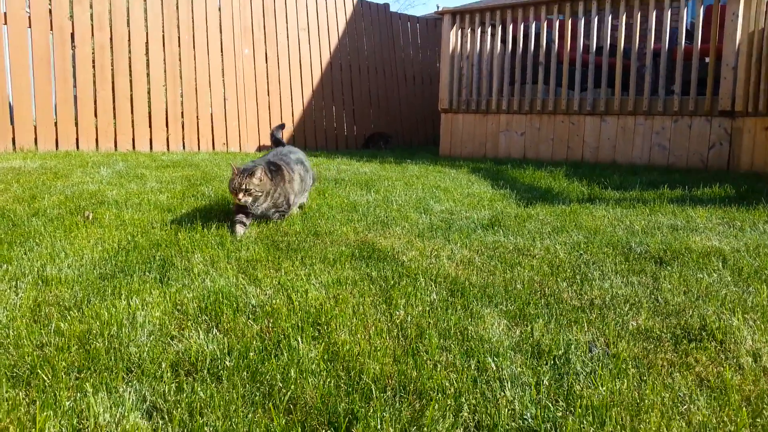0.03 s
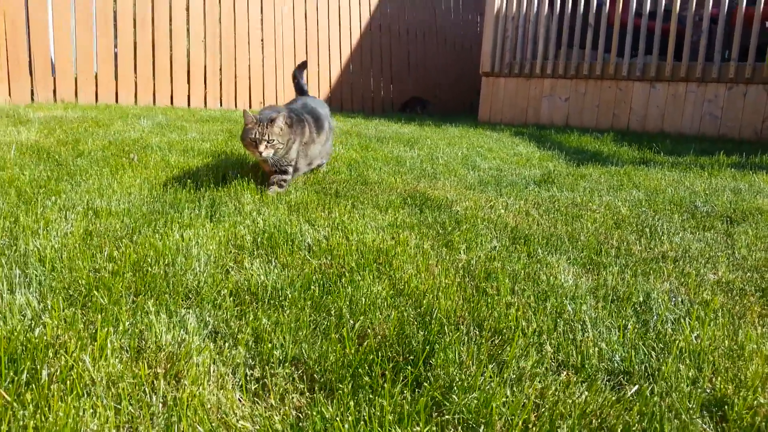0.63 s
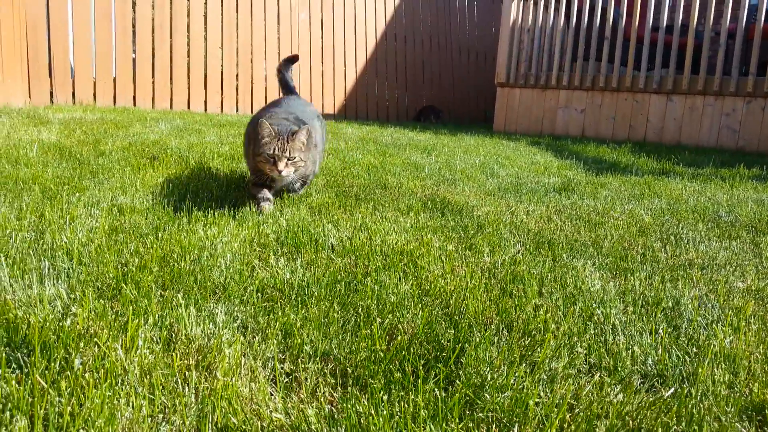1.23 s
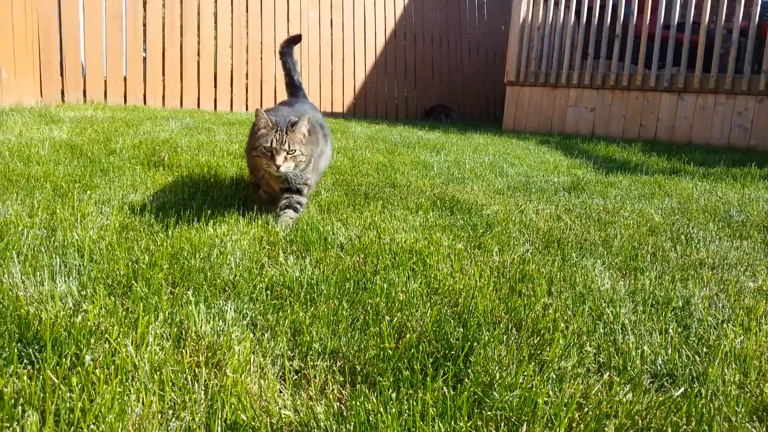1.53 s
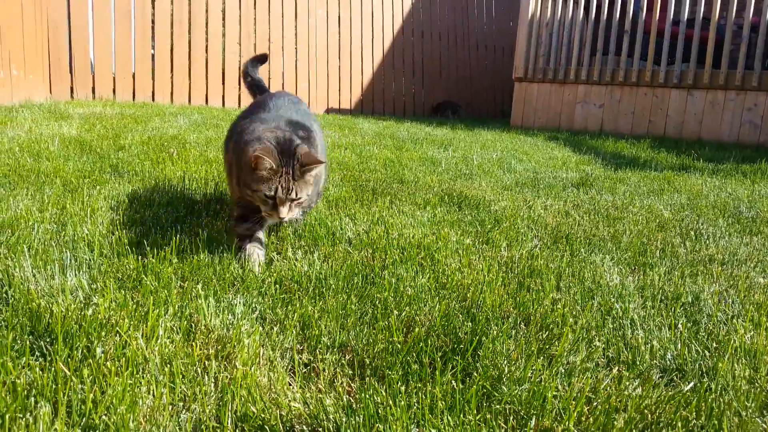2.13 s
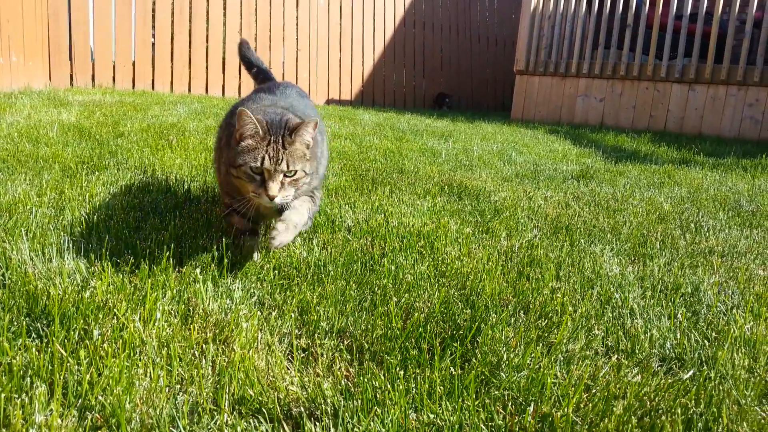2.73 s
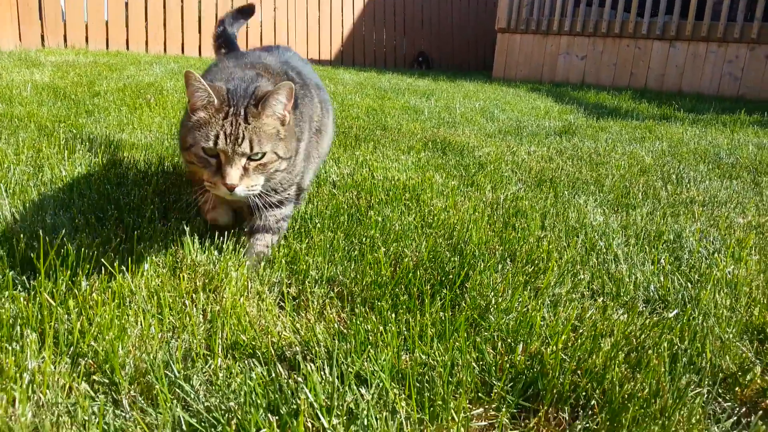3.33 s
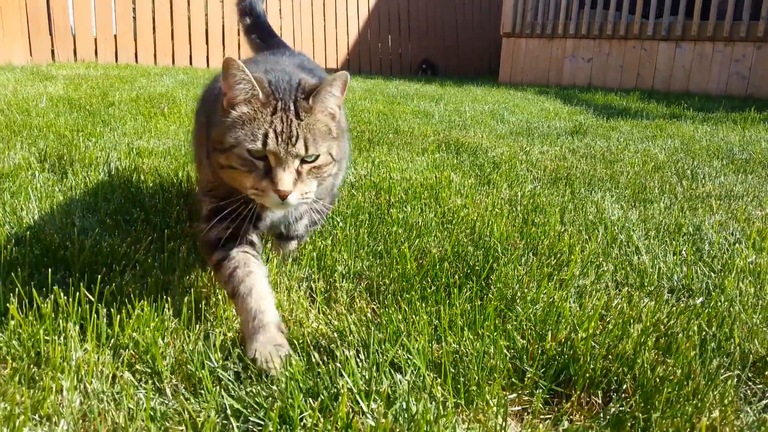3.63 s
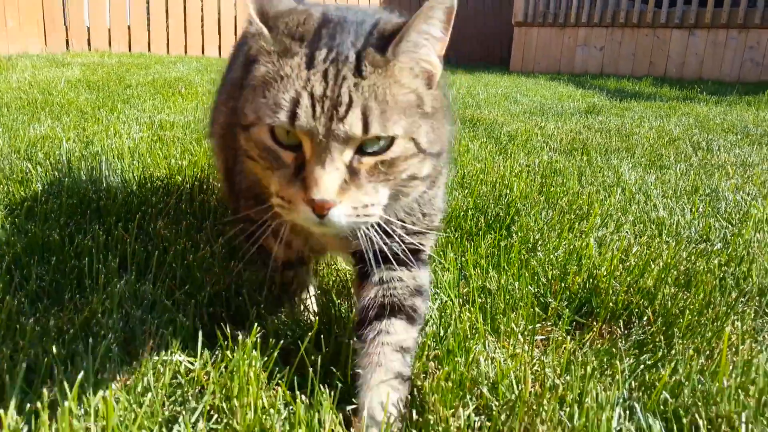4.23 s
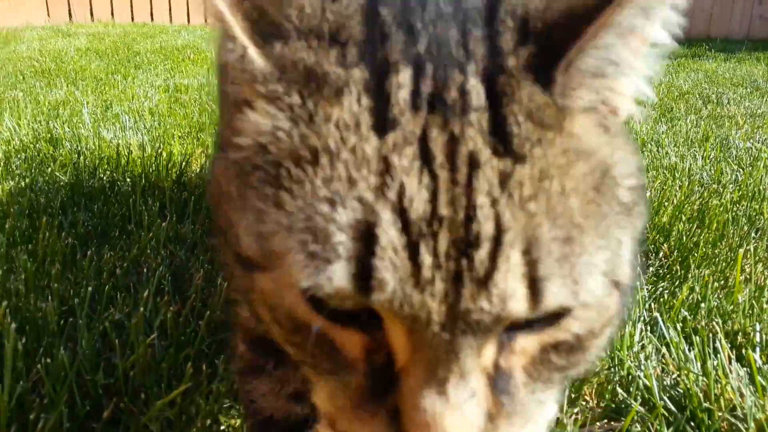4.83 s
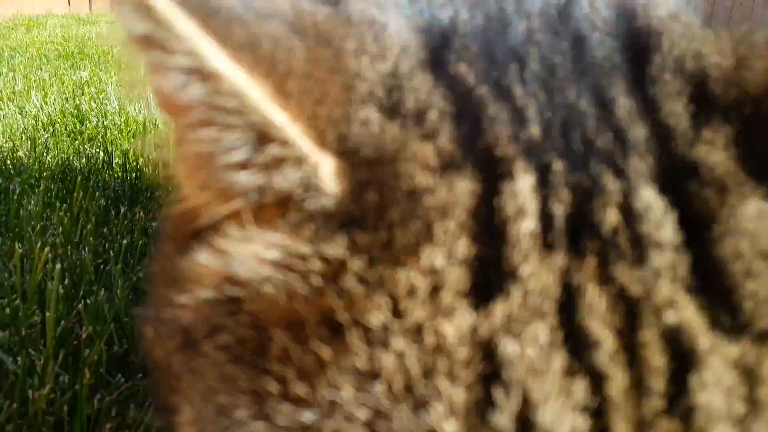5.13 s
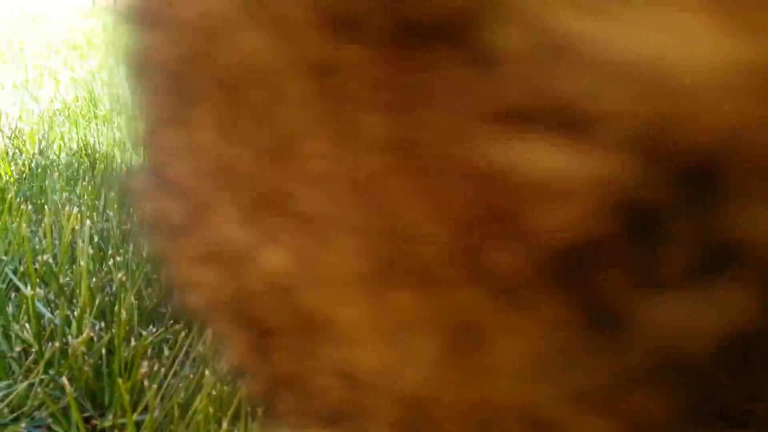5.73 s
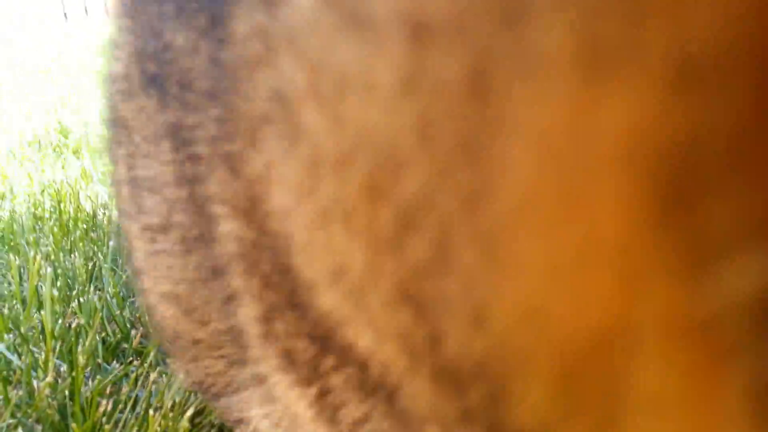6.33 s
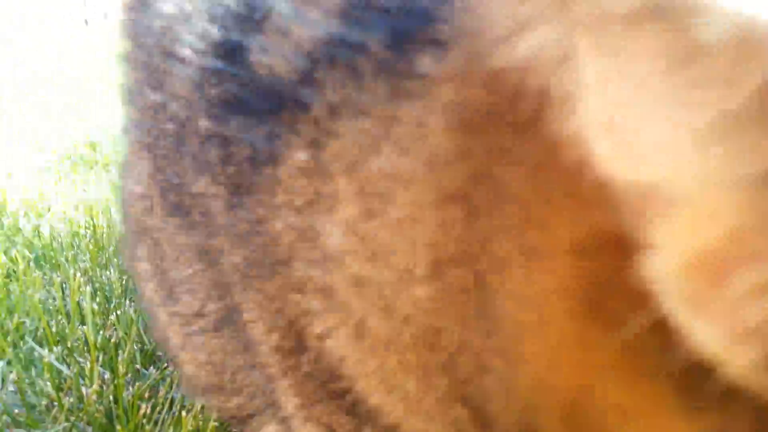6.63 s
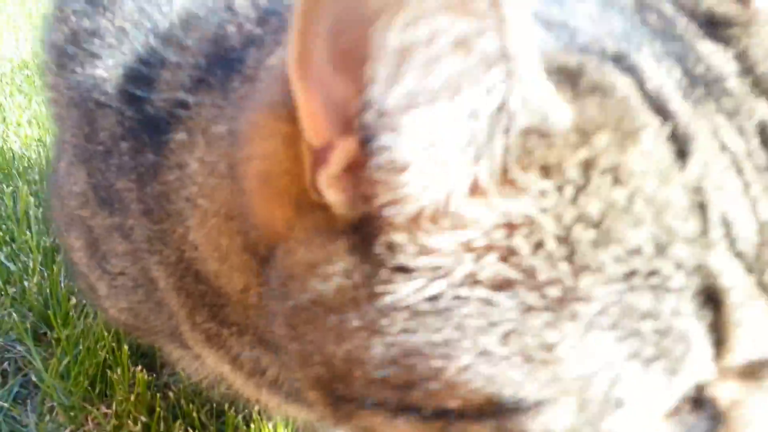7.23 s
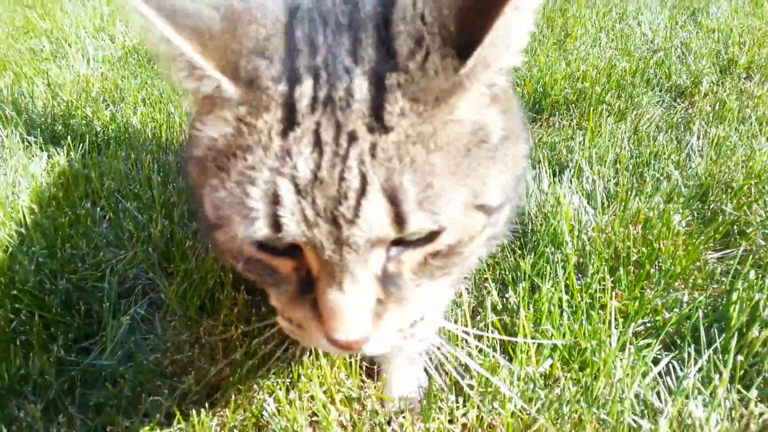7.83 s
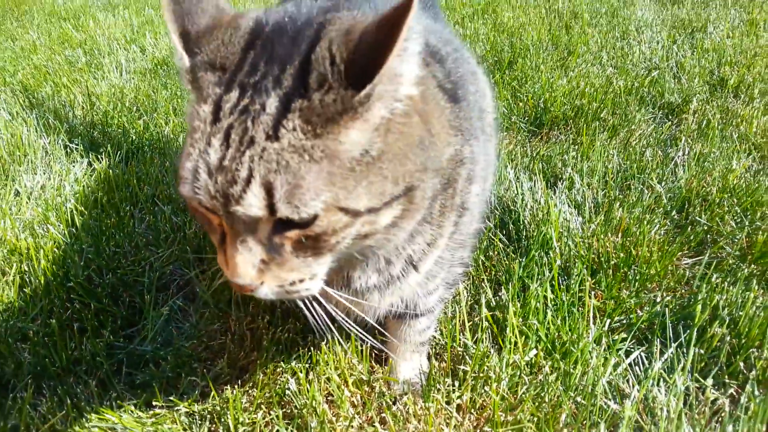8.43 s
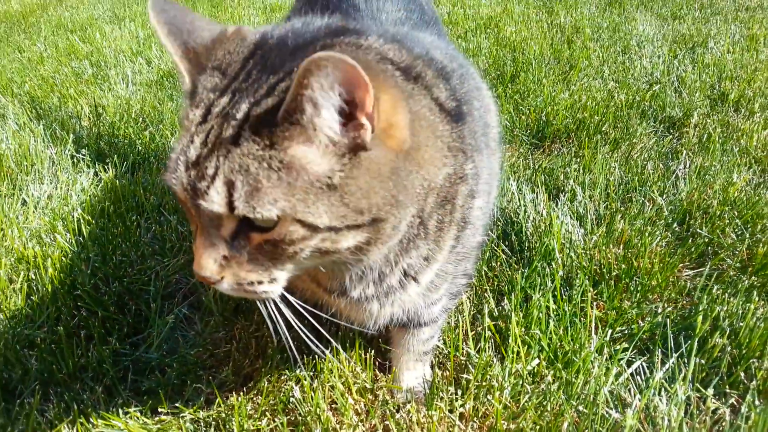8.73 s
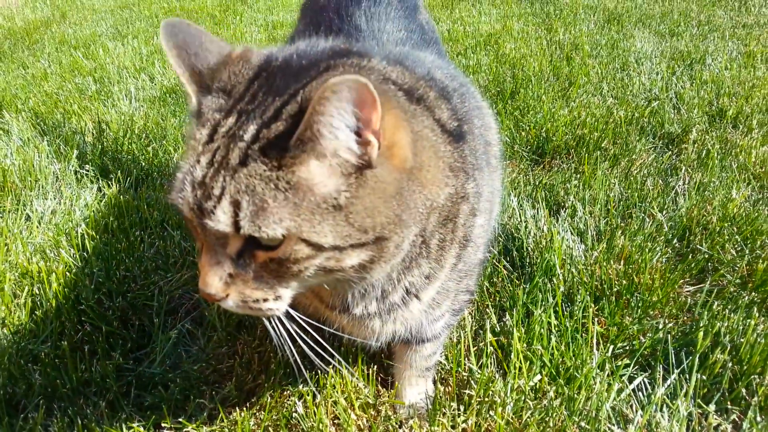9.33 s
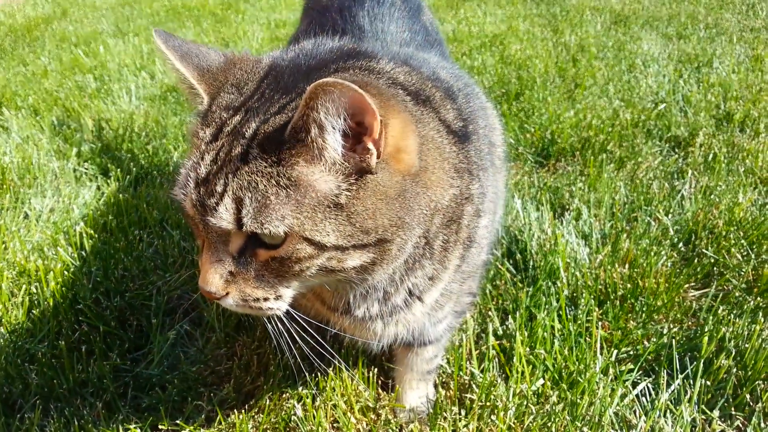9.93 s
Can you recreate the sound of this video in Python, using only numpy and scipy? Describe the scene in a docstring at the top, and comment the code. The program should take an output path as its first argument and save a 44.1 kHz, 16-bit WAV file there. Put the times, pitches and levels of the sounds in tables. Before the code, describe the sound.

Faint swishes of a cat's paws in lawn grass come closer to a handheld microphone, over soft outdoor rumble and a distant engine. A sharp click follows, then about three seconds of very close fur brushing, with low rumbling and thumps shifting between left and right. The rubbing peaks and eases off, and a small bird chirps faintly at the end among soft hand bumps.

```python
"""A cat rubs its head on the camera

A cat swishes through lawn grass up to a camera held low, then rubs its head on the case.
Fur hisses past the two microphone ports (small holes) and pumps the air in each as it presses on it;
tufts snag and thump, whiskers scratch, the case ticks and shifts in the hand.
A far engine drones behind the garden, and a small bird chirps at the end."""
import sys
import numpy as np
from scipy import signal
from scipy.fft import rfft, irfft, next_fast_len
from scipy.io import wavfile

SR = 44100
rng = np.random.default_rng(int(sys.argv[2]) if len(sys.argv) > 2 else 0)


def materialize(psi):
    """Save the field psi as 16-bit PCM at rate SR to the path in sys.argv[1].

    A 1-D psi becomes a single channel; in a 2-D psi each row is a channel.
    """
    bounded = np.clip(np.atleast_2d(psi).T, -1, 1)
    quanta = np.round(bounded * 32767).astype(np.int16)
    wavfile.write(sys.argv[1], SR, quanta)


N = 439677
TIME = np.arange(N) / SR
SLOW_TIME = TIME[::64]  # coarse clock for loudness curves

# tone of hair scraping the case: f/Hz, level/dB
SCRAPE_COLOUR = [(2500, -5), (4300, 3), (5700, 5.5), (7000, 1.5), (9000, -21)]


def amp(db):
    """Turns decibels into a gain."""
    return 10 ** (np.asarray(db) / 20)


def unit(x):
    """Scales a signal to an average power of 1."""
    return x / np.sqrt(np.mean(x ** 2) + 1e-20)


def at_hz(rows, hz, column=1):
    """Reads a table between its rows, on a log-frequency scale."""
    table = np.transpose(rows)
    return np.interp(np.log(hz + 1), np.log(table[0] + 1), table[column])


def curve(rows):
    """Joins (time, value) points with straight lines."""
    return np.interp(TIME, *np.transpose(rows))


def sides(pan_db):
    """Left and right gains; pan is how much louder the left is."""
    return unit(amp([[pan_db / 2], [-pan_db / 2]]))


def add(mix, start, sound):
    """Mixes a sound in at a start time in seconds."""
    part = mix[..., max(round(start * SR), 0):][..., :sound.shape[-1]]
    part += sound[..., :part.shape[-1]]


def shaped(x, colour):
    """Filters a signal by a colour (a level for each frequency), then scales it to power 1."""
    size = next_fast_len(N)
    gain = amp(at_hz(colour, np.fft.rfftfreq(size, 1 / SR)))
    return unit(irfft(rfft(x, size) * gain, size)[..., :N])


def wander(per_s):
    """A random curve of power 1 that heads for a new value per_s times a second."""
    return unit(np.interp(TIME * per_s, np.arange(4096), rng.standard_normal(4096)))


def grains(per_s, spread_db=0):
    """Tiny random clicks at both ports; more spread makes their sizes more unequal."""
    size = amp(spread_db * np.minimum(rng.exponential(1, (2, N)), 4.5))
    return unit(size * rng.choice([-1, 1], (2, N)) * (rng.random((2, N)) < per_s / SR))


def distant_noise():
    """Noise whose bass is much the same at both ports."""
    # how alike left and right are: f/Hz, likeness (0 to 1)
    likeness = [(60, 0.73), (200, 0.89), (350, 0.66), (700, 0.29), (1400, 0)]
    size = next_fast_len(N)
    left, other = rfft(rng.standard_normal((2, size)))
    same = at_hz(likeness, np.fft.rfftfreq(size, 1 / SR))
    right = same * left + np.sqrt(1 - same ** 2) * other
    return irfft([left, right], size)[:, :N]


def from_right(pair, same):
    """Part of the sound reaches the left port 9 samples after the right."""
    left, right = pair
    return np.array([same * np.roll(right, 9) + np.sqrt(1 - same ** 2) * left, right])


def gains(powers):
    """Turns power curves on the coarse clock into gains at every sample."""
    return np.array([np.interp(TIME, SLOW_TIME, np.sqrt(p)) for p in powers])


def swells(rows):
    """Left and right gains for sounds that each swell to a peak and fade."""
    shape = 1.35  # 2 is round, 1 pointed
    return gains(sum((amp(db) * sides(pan)) ** 2 * np.exp(-abs((SLOW_TIME - peak) / half) ** shape)
                     for peak, db, half, pan in rows))


def held(start, length, attack_s, release_s, sag_db_per_s=0):
    """Gain of one touch on the coarse clock: it builds up, holds or sags, and dies away."""
    t = SLOW_TIME - start
    rise = np.clip(t / attack_s, 0, 1)
    sag = amp(-sag_db_per_s * np.clip(t, 0, length))
    return rise * sag * np.exp(-np.maximum(t - length, 0) / release_s)


def garden():
    """The neighbourhood rumbles low while a far engine wavers and fades in and out of it."""
    # the engine's lowest note: t/s, level/dB
    drone_levels = [(0, -55), (.9, -61), (2.1, -76.5), (2.95, -61), (3.5, -70.5), (8.2, -61.5), (9.7, -56)]
    # its overtones together: t/s, level/dB
    overtone_levels = [(2.6, -77.5), (3.2, -69.5), (8.6, -64)]
    # each overtone's share: multiple of the lowest note, level/dB
    overtones = [(2, 0), (3, -16), (4, -12), (6, -16)]
    # loudness of the garden air: t/s, level/dB
    air_levels = [(0, -61), (.15, -56.5), (1, -62), (1.8, -59), (2.5, -63.5), (3.4, -62.5), (3.9, -59),
                  (8.2, -59)]
    # its tone: f/Hz, level/dB
    air_colour = [(20, -30), (50, -6.5), (85, 0.5), (190, -1.5), (330, -8.5), (600, -14.5), (900, -11),
                  (1500, -19), (3000, -26), (7000, -36), (14500, -27)]
    engine_hz = 98.9 * (1 + 0.016 * wander(12))
    turns = np.cumsum(engine_hz) / SR
    drone = amp(curve(drone_levels)) * unit(amp(3.3 * wander(20)) * np.sin(2 * np.pi * turns))
    buzz = sum(amp(db + 2 * wander(12)) * np.sin(2 * np.pi * (multiple * turns + rng.random()))
               for multiple, db in overtones)
    air = amp(curve(air_levels) + 1.6 * wander(14)) * shaped(distant_noise(), air_colour)
    return air + drone + amp(curve(overtone_levels)) * unit(buzz)


def ticks():
    """A hard tip flicks the case: a brief burst, a rebound and a faint rattle, all ringing in it."""
    # sharp ticks: t/s, level/dB, f/Hz, pan/dB, cycles to the peak, rattle/dB
    hits = [(0.092, -27.5, 1850, 7, 0.27, -36), (4.288, -46.5, 5550, 17, 0.48, -42),
            (4.4057, -13.5, 10960, -12, 0.57, -41.5), (6.5076, -32.5, 5560, 22, 0.15, -44),
            (6.9948, -37.5, 6800, 10, 0.3, -42)]
    # the notes the case rings at: f/Hz, left/dB, right/dB
    case_notes = [(3760, -2, 6.5), (4820, 6, -16), (6100, 4.5, 4), (10100, -23, 1), (14230, 11, -15.5)]
    decay_s, rebound_s = 0.00035, 0.001123
    taps, t = np.zeros((2, N)), np.arange(4096) / SR
    case = sum(amp([[left], [right]]) * np.cos(2 * np.pi * hz * t) for hz, left, right in case_notes)
    case *= 2 / (decay_s * SR) * np.exp(-t / decay_s)
    for start, db, hz, pan, cycles, rattle_db in hits:
        age = hz * t / cycles  # 1 at the peak
        burst = age * np.exp(1 - age) * np.cos(2 * np.pi * hz * t)
        rattle_fade = .04 * np.exp(-t / .001) + amp(rattle_db) * np.exp(-t / .014)
        rattle = rattle_fade * rng.standard_normal((2, len(t)))
        add(taps, start, amp(db + 4.5) * sides(pan) * (burst + rattle))
        add(taps, start + rebound_s, amp(db - 13.5) * sides(pan) * burst)
    return amp(-6.5) * taps + signal.oaconvolve(taps, case, axes=1)[:, :N]


def handling():
    """The camera shifts in the hand and catches puffs of air; nudging fingers make it ring briefly."""
    # soft bumps and puffs: t/s, level/dB, half length/s, pan/dB
    bumps = [(.1, -46.5, 0.015, 1), (.825, -50.5, 0.011, -1), (1.19, -49, 0.017, 0), (1.556, -44, 0.02, 1),
             (1.61, -44, 0.018, -4), (1.7, -47, 0.037, -4.5), (3.6, -46.5, 0.0041, -4),
             (4.03, -43.5, 0.018, -3), (8.37, -54, 0.012, 2), (8.69, -47, 0.017, 3),
             (8.975, -46.5, 0.0085, -1), (9.15, -50.5, 0.031, 2), (9.235, -48, 0.013, 3),
             (9.4, -46.5, 0.013, 1), (9.465, -48.5, 0.017, 1)]
    # their tone: f/Hz, level/dB
    bump_colour = [(20, -9), (50, -15), (90, 8.5), (135, -2.5), (185, -1), (280, -10.5), (1500, -24),
                   (5000, -45)]
    # finger nudges: t/s, level/dB, f/Hz, decay/s
    knocks = [(4.021, -34, 191, 0.022), (8.671, -36.5, 82, 0.0073), (9.392, -38, 76, 0.017),
              (9.904, -40, 68.5, 0.036)]
    out = swells(bumps) * shaped(distant_noise(), bump_colour)
    for start, db, hz, decay_s in knocks:
        t = np.maximum(TIME - start, 0)
        out += amp(db) * np.sin(2 * np.pi * hz * t) * np.exp(-t / decay_s)
    add_thump(out[1], 1.581, push=-.09, hz=130)  # one puff goes straight into the right port
    return out


def add_thump(channel, peak_s, push, hz):
    """A port is plugged or pulled free: one pressure spike, then a rebound as its air leaks back."""
    leak_hz = 64  # below this a port cannot hold pressure
    t = np.arange(-900, 1500) / SR
    angle = np.pi * hz * t
    spike = (1 - 2 * angle ** 2) / (1 + angle ** 2 / 2) ** 4
    spike = signal.lfilter(*signal.butter(2, leak_hz, "highpass", fs=SR), spike)
    add(channel, peak_s - spike.argmax() / SR, push * spike / spike.max())


def whoosh():
    """A faint, far, mid-pitched rush swells and fades."""
    # its swells: t/s, level/dB, half length/s, pan/dB
    rushes = [(.275, -61, 0.032, 0), (.46, -65.5, 0.2, 2)]
    # its tone: f/Hz, level/dB
    rush_colour = [(400, -16), (800, -7), (1100, -1), (1600, -17), (4000, -54)]
    return swells(rushes) * shaped(distant_noise(), rush_colour)


def grass():
    """Blades scrape along the legs at each step; now and then one whips past with a brighter flick."""
    # paws and legs in the grass: t/s, level/dB, half length/s, pan/dB
    steps = [(.48, -60, 0.016, 6), (.597, -57, 0.012, 2), (1.19, -59, 0.038, -1.5),
             (1.92, -58.5, 0.017, -2), (2.103, -57, 0.0088, 0), (2.155, -51.5, 0.021, -0.5),
             (2.358, -57, 0.0084, -2), (2.642, -62.5, 0.011, 2), (3.13, -52.5, 0.043, 0),
             (3.225, -51, 0.038, 1.5), (3.82, -44.5, 0.02, -1.5), (3.89, -52, 0.026, -0.5),
             (3.945, -52, 0.013, 2), (4.1, -61, 0.14, 2), (4.295, -46.5, 0.017, 3), (4.345, -47, 0.021, 0),
             (4.62, -49, 0.047, -2), (4.94, -44, 0.034, -0.5), (5.07, -50.5, 0.046, 3),
             (5.38, -56, 0.028, 10), (5.82, -53, 0.026, 5), (7.95, -50, 0.017, -2),
             (8.85, -56.5, 0.014, -4)]
    # single whipping blades: t/s, level/dB, half length/s, pan/dB
    flicks = [(2.787, -47.5, 0.012, 8), (5.655, -54, 0.011, 0)]
    # tone of a step: f/Hz, level/dB
    step_colour = [(100, -23.5), (400, 8), (1500, 6), (3000, 2), (5000, 4.5), (14500, 5)]
    # tone of a flick: f/Hz, level/dB
    flick_colour = [(1500, -7.5), (7000, -4), (10500, 5.5), (14500, 6.5)]
    blades = grains(per_s=1700, spread_db=2.5) + 0.5 * rng.standard_normal((2, N))
    flutter = amp(-4.5 + 1.2 * wander(70))
    swish = flutter * swells(steps) * shaped(from_right(blades, same=0.05), step_colour)
    return swish + swells(flicks) * shaped(blades, flick_colour)


def thin_hiss():
    """A faint, thin hiss, mostly on the left, while the cat closes in."""
    # its tone: f/Hz, level/dB
    hiss_colour = [(3800, -13), (5700, 0), (8000, -7)]
    fade = gains([held(start=3.04, length=2.16, attack_s=0.4, release_s=0.28) ** 2])
    level = amp(-74 + 2 * wander(11)) * fade
    return level * sides(6) * shaped(rng.standard_normal((2, N)), hiss_colour)


def buffeting():
    """Fur dragging across a port pumps its air in lumps, harder while the head leans on that port."""
    # the head leans: t/s, length/s, level/dB, port (0 left, 1 right)
    leans = [(4.718, 0.42, -40.5, 0), (4.872, 0.14, -35.5, 0), (5.694, 0.36, -41.5, 0),
             (6.059, 0.38, -36.5, 0), (6.823, 0.12, -35.5, 0), (6.977, 0.19, -36, 0),
             (4.694, 0.45, -38.5, 1), (5.294, 0.18, -36.5, 1), (5.888, 0.76, -39, 1),
             (6.604, 0.2, -30.5, 1), (6.928, 0.099, -27.5, 1), (7.076, 0.15, -32, 1),
             (7.273, 0.21, -31.5, 1), (7.551, 0.14, -35.5, 1), (7.765, 0.16, -34.5, 1)]
    # tone of the lumps of air: f/Hz, level/dB
    lump_colour = [(15, -58), (30, -18), (55, 1), (110, 2.5), (190, -4), (300, -18.5), (480, -33),
                   (1500, -39.5), (4000, -59)]
    # the higher scuff of the hardest leans: f/Hz, level/dB
    scuff_colour = [(120, -9), (260, 6), (420, -5.5), (750, -15.5), (1550, -43)]
    attack_s, release_s = 0.016, 0.021
    light_touch = amp(-50.5) * held(4.66, 3.38, attack_s, release_s)  # fur resting on both ports
    power = np.ones((2, 1)) * light_touch ** 2
    for start, length, db, port in leans:
        power[port] += (amp(db) * held(start, length, attack_s, release_s)) ** 2
    pressure = gains(power)
    flutter_db = 2 * np.array([wander(45), wander(45)])  # the fur drags unevenly
    slip_db = 4.5 * np.maximum([wander(32), wander(32)], 0)  # and at moments loses its grip
    lumps = grains(per_s=120, spread_db=0.6) + .25 * rng.standard_normal((2, N))
    scuff = amp(-11) * pressure / pressure.max() * shaped(grains(per_s=900), scuff_colour)
    return pressure * amp(3.5 + flutter_db - slip_db) * (shaped(lumps, lump_colour) + scuff)


def snags():
    """Tufts of fur catch in a port and let go with a thump."""
    # tufts: t/s, peak pressure (suction is negative), f/Hz, port (0 left, 1 right)
    tufts = [(4.698, -0.029, 98, 0), (4.7633, -0.11, 130, 1), (4.8733, -0.13, 160, 1),
             (4.9224, 0.07, 100, 0), (4.9497, -0.11, 135, 0), (4.9679, -0.13, 95, 0),
             (5.003, -0.21, 151, 0), (5.092, -0.048, 130, 1), (5.3148, 0.065, 120, 1),
             (5.3685, -0.059, 122, 1), (5.4162, -0.072, 130, 1), (5.443, -0.071, 111, 1),
             (5.467, -0.037, 167, 1), (5.8, -0.08, 124, 1), (5.907, -0.026, 110, 0),
             (5.959, -0.023, 120, 1), (6.004, -0.036, 114, 0), (6.0929, 0.093, 123, 0),
             (6.1882, 0.091, 130, 0), (6.211, -0.095, 118, 1), (6.2554, -0.12, 128, 1),
             (6.2888, 0.077, 134, 0), (6.457, -0.064, 107, 0), (6.5418, -0.096, 137, 1),
             (6.622, 0.066, 190, 1), (6.6301, 0.12, 158, 1), (6.646, -0.19, 163, 1), (6.6563, 0.17, 203, 1),
             (6.7019, 0.19, 193, 1), (6.7384, 0.11, 188, 1), (6.752, -0.14, 139, 1), (6.769, -.32, 166, 1),
             (6.7834, 0.23, 188, 1), (6.9646, 0.12, 240, 1), (6.995, 0.25, 218, 1), (7.029, 0.33, 220, 1),
             (7.1556, -0.1, 150, 1), (7.1637, 0.15, 250, 1), (7.2005, 0.13, 240, 1), (7.2081, 0.13, 115, 1),
             (7.3491, 0.12, 137, 1), (7.3747, -0.13, 121, 1), (7.4506, 0.11, 170, 1),
             (7.8143, -0.059, 138, 1), (7.858, -0.031, 145, 1)]
    out = np.zeros((2, N))
    for peak_s, push, hz, port in tufts:
        add_thump(out[port], peak_s, push, hz)
    return out


def fur():
    """Countless hairs slip over the case: a fine hiss, a coarser rasp and a focused scrape."""
    # the head slides along: t/s, length/s, hiss/dB, rasp/dB, scrape/dB
    strokes = [(5.11, 0.48, -63.5, -67, -76), (5.852, 0.22, -48, -64, -52), (6.027, 0.5, -47.5, -62, -44.5),
               (6.064, 0.17, -44.5, -68, -44.5), (6.395, 0.11, -53.5, -61, -47),
               (6.532, 0.31, -53, -62, -55.5), (6.891, 0.21, -43, -58.5, -61),
               (7.089, 0.37, -46, -54.5, -49.5), (7.09, 0.042, -37.5, -78, -54), (7.56, 0.4, -62, -60, -64),
               (7.82, 0.27, -57.5, -65.5, -59.5)]
    # tone of the hiss: f/Hz, level/dB
    hiss_colour = [(400, -40), (1500, -0.5), (3500, -1), (9000, 0.4), (14500, 0.5)]
    # tone of the rasp: f/Hz, level/dB
    rasp_colour = [(200, 8), (600, 4), (1200, -1), (2800, -7.5), (4500, -10), (9000, -83)]
    release_s = np.array([[0.085], [0.085], [0.012]])  # the scrape stops as soon as the fur lifts
    power = 0
    for start, length, *levels_db in strokes:
        # a stroke starts fast, then gets quieter as it slows
        slide = held(start, length, attack_s=0.11, release_s=release_s, sag_db_per_s=10.5)
        power += (amp(levels_db)[:, None] * slide) ** 2
    fine, coarse, focused = gains(power)
    catching_db = 1.1 * wander(320)
    hairs = grains(per_s=1400, spread_db=2.8) + 0.6 * rng.standard_normal((2, N))
    hiss = amp(-5) * fine * sides(2.3) * shaped(from_right(hairs, same=0.065), hiss_colour)
    rasp = amp(5.5) * coarse * sides(6.2) * shaped(grains(per_s=4400), rasp_colour)
    scrape = amp(-10.5) * focused * sides(5.9) * shaped(grains(per_s=1600, spread_db=0.5), SCRAPE_COLOUR)
    return amp(wander(60) + catching_db) * (hiss + rasp + scrape)


def whiskers():
    """Stiff whiskers chatter across the case in short bursts."""
    # scratches: t/s, level/dB, half length/s, pan/dB
    scratches = [(6.963, -44.5, 0.0027, 16), (6.986, -55, 0.0044, 17), (7.033, -50, 0.0062, 15),
                 (7.156, -53, 0.0078, 12)]
    return swells(scratches) * shaped(grains(per_s=1100, spread_db=1.5), SCRAPE_COLOUR)


def bird():
    """Short sliding whistles, some pure and some buzzy, smeared by echoes off fences and houses."""
    # notes: t/s, length/s, start f/Hz, end f/Hz, level/dB, buzz as a share of the pitch
    chirps = [(9.11, 0.075, 3900, 4060, -67, 0.015), (9.175, 0.064, 3970, 3760, -57, 0.019),
              (9.318, 0.097, 3330, 3080, -66.5, 0.048), (9.377, 0.053, 3920, 3810, -66, 0.019),
              (9.498, 0.05, 4400, 4340, -71, 0.015), (9.686, 0.089, 4200, 3780, -60.5, 0.034),
              (9.738, 0.037, 3700, 3650, -51.5, 0.008), (9.877, 0.097, 2830, 3430, -59.5, 0.065)]
    song, t = np.zeros(N), np.arange(SR // 3) / SR
    for start, length, start_hz, end_hz, db, buzz in chirps:
        progress = np.linspace(0, 1, int(length * SR))
        glide_hz = start_hz + (end_hz - start_hz) * progress
        hz = glide_hz * (1 + buzz * wander(700)[:len(progress)])
        add(song, start, amp(db) * np.sin(np.pi * progress) * np.sin(2 * np.pi * np.cumsum(hz) / SR))
    build_s, echo_s = 0.012, 0.25
    echoes = rng.standard_normal((2, len(t))) * amp(-60 * t / echo_s) * (1 - np.exp(-t / build_s))
    echoes /= np.linalg.norm(echoes[0])
    return 0.22 * song + signal.fftconvolve(song[None], echoes, axes=1)[:, :N]


def scene():
    """Everything that arrives at the two ports."""
    outdoors = garden() + whoosh() + bird()
    cat = grass() + fur() + buffeting() + snags() + whiskers() + ticks()
    return outdoors + cat + handling() + thin_hiss()


def record(dry):
    """Each port rings in its own way; peaks past full scale are clipped and the top treble is cut."""
    # how the ports boost or soften each pitch: f/Hz, left/dB, right/dB
    ports = [(595, 1, 0), (1375, -1, -4.5), (2267, 4, -1.5), (3630, 5.5, 0), (5880, 12.5, 6),
             (6250, 10.5, 10), (7180, 8.5, 15), (8590, 5, 8), (11280, 3.5, 3.5), (15600, -5.5, -3)]
    top_hz = 14750
    hz = abs(np.fft.fftfreq(2048, 1 / SR))
    log_gain = np.log(amp([at_hz(ports, hz, column=1), at_hz(ports, hz, column=2)]))
    # minimum phase: the ringing comes after each sound, never before it
    ring = np.fft.ifft(np.exp(np.conj(signal.hilbert(log_gain)))).real
    heard = np.clip(signal.oaconvolve(dry, ring, axes=1)[:, :N], -1, 1)
    treble_cut = signal.firwin(401, top_hz, window=("kaiser", 8), fs=SR)
    return signal.oaconvolve(heard, treble_cut[None], "same")


dry = scene()
out = record(dry)
materialize(out)
```